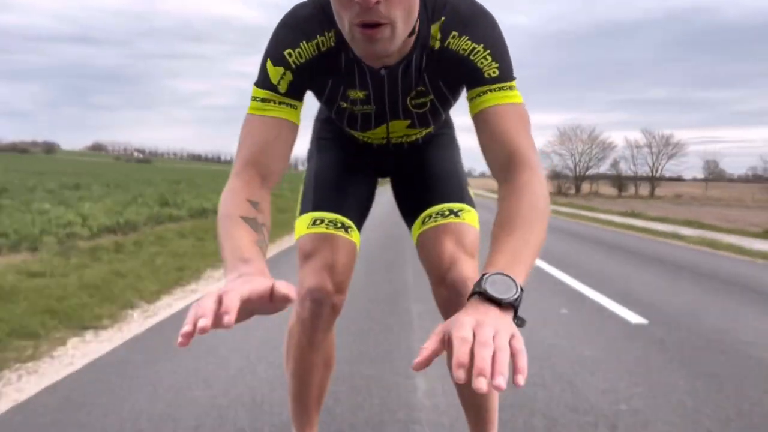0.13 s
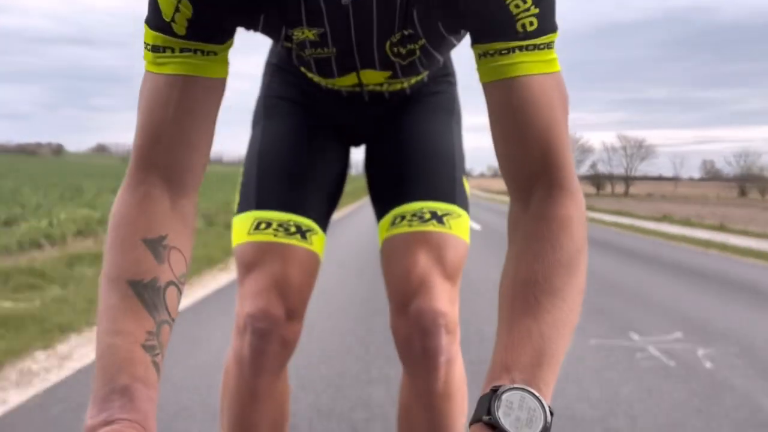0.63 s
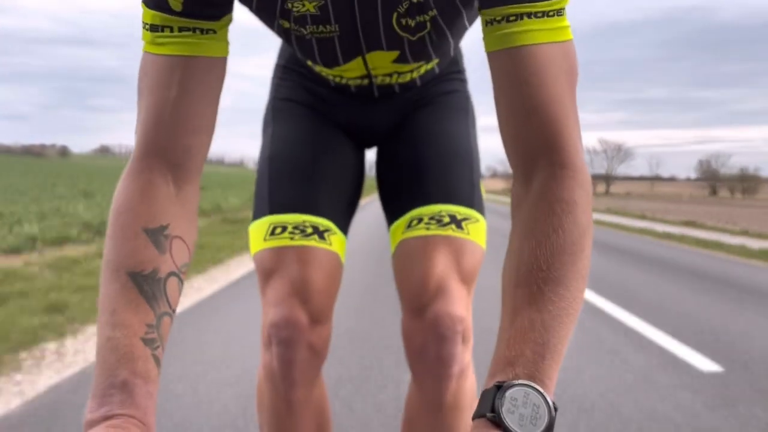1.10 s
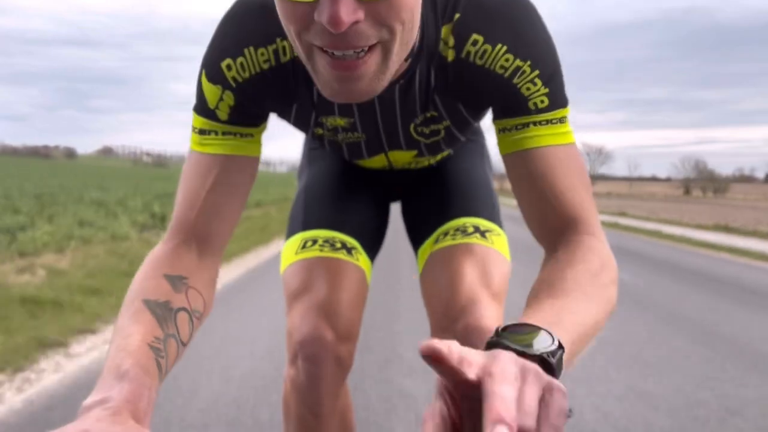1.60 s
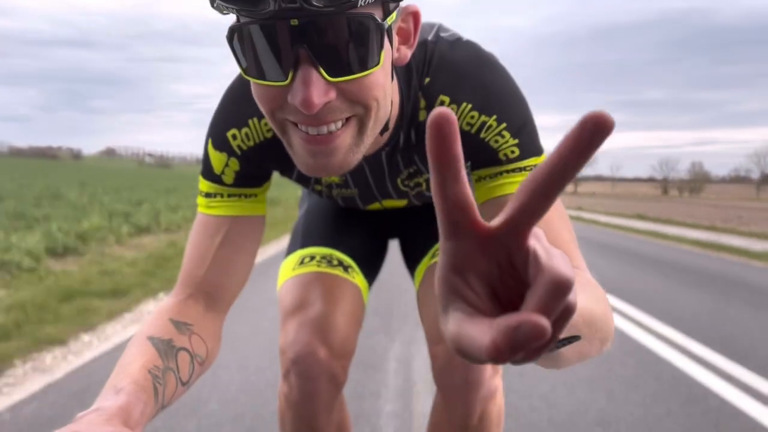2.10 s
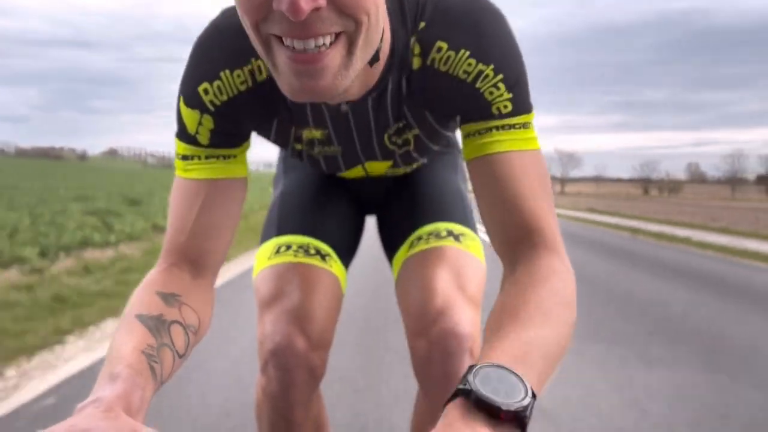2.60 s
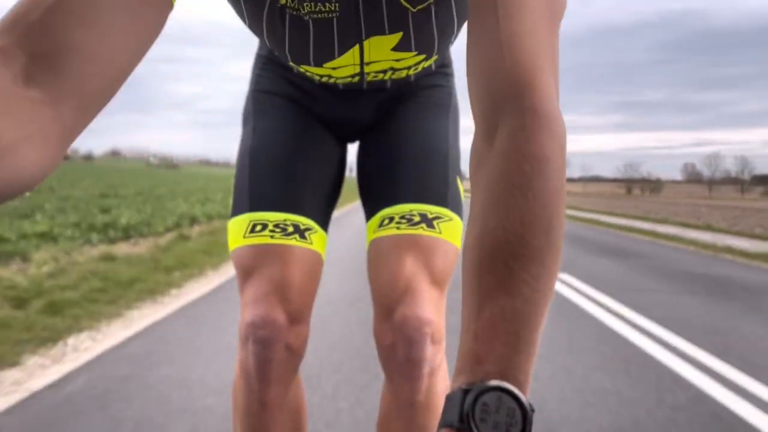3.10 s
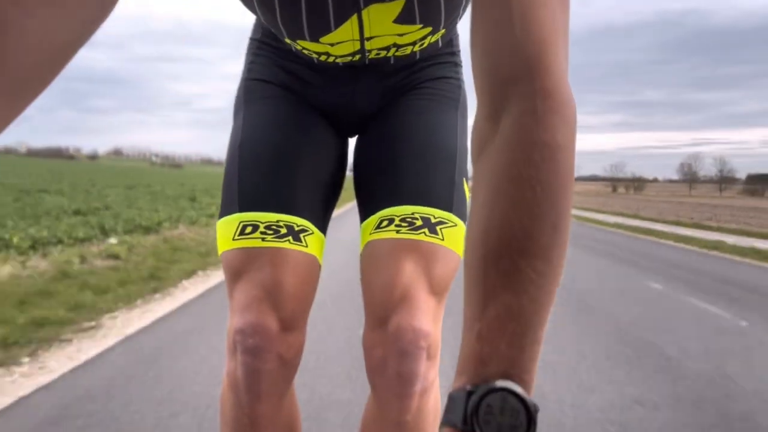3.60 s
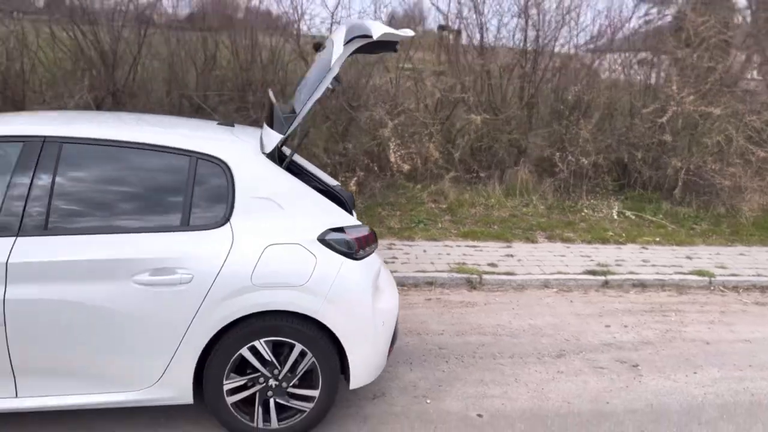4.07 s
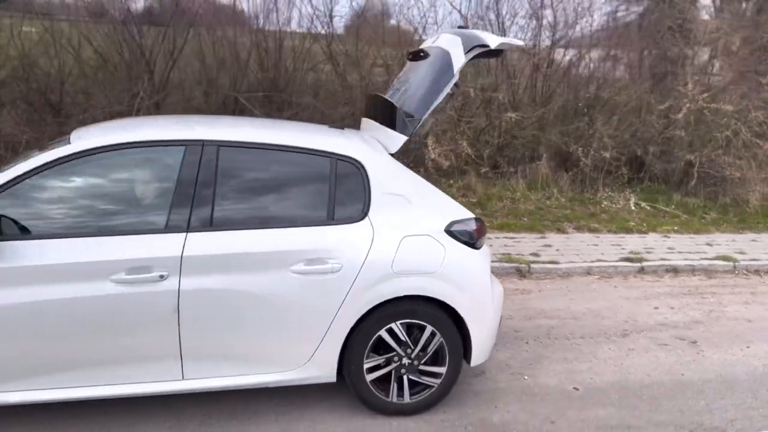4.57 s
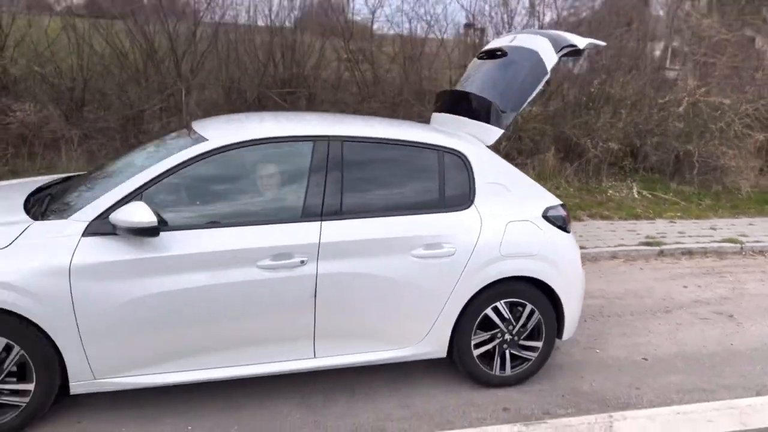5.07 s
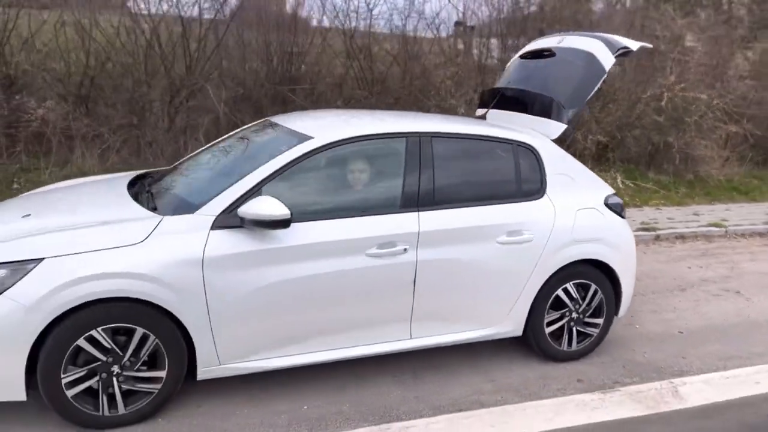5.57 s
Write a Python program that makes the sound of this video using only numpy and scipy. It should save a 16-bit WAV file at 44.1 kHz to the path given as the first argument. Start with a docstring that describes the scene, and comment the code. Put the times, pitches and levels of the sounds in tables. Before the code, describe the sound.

For the first 3.7 seconds, a phone in the open hatch of a moving car catches a loud, broad rush of tyres and small hard wheels on rough asphalt, hollow with boot resonances and wavering wheel tones. Beneath it runs a low engine drone near 57 Hz, sagging slightly, easing off around 0.9. Wind buffets throughout. A sharp stone chip clicks at 0.36; a strong gust and thumps hit near 0.77, after which the hiss dulls; another chip and thump come at 2.6. The ride fades rapidly by 3.8, and a much quieter open roadside fades in. A distant vehicle passes dully around 4.0, while thin high bird notes fall at 3.9 and 4.0, with a very faint one at 4.6. Skate wheels scrape sandily and tick on grit, drifting left, rolling more smoothly with faint hollow tones from 4.8. Soft low wind puffs bump the handheld microphones from 4.2 to the end.

```python
"""A phone rides in the open hatch of a car: three-cylinder drone from harmonics of one phase, tyre and
small-wheel rush from flickering noise bands, buffeting air from low noise, two stone chips and a few thumps.
At 3.8 s the ride has faded out and the roadside fades in: puffs of wind thump on the hand-held microphones,
a far vehicle passes as dull noise, skate wheels scrape in resonant noise and tick as ringing modes to the left,
and a small bird calls in sliding sines."""
import sys
import numpy as np
from scipy import signal
from scipy.fft import rfft, irfft, next_fast_len
from scipy.io import wavfile
from scipy.ndimage import uniform_filter1d, map_coordinates

SR = 44100
rng = np.random.default_rng(int(sys.argv[2]) if len(sys.argv) > 2 else 0)


def file_out(sig):
    """Save sig as 16-bit WAV at sys.argv[1]."""
    # one column per channel
    cols = np.atleast_2d(sig).T
    # limit, then scale
    lim = np.clip(cols, -1, 1)
    pcm = np.round(lim * 32767).astype(np.int16)
    wavfile.write(sys.argv[1], SR, pcm)


def level_to_linear(level):
    """Convert decibel levels to linear amplitude factors, elementwise."""
    exponent = np.asarray(level, float) / 20
    return 10 ** exponent


N = 250929
T = np.arange(N) / SR
SIZE = next_fast_len(N)
HZ = np.arange(SIZE // 2 + 1) * SR / SIZE + 1e-3  # just above zero, for logarithms
SIDES = np.array([[1], [-1]])  # left, right

# All source levels stand ahead of the fades in scene().
# Fade-in of the roadside: (time [s], gain [0-1])
KERB_FADE = [(3.797, 0), (3.86, 0.41), (3.95, 0.75)]
# Resonances of the skate wheels: (frequency [Hz], width [Hz], lift [dB])
WHEEL = [(950, 200, 2), (1480, 220, 8), (1660, 150, 5), (1870, 110, -3), (2100, 170, 1), (3350, 500, 6),
         (5600, 1200, 2), (6600, 700, 1), (8300, 800, -3)]
# Likeness of the two microphone ports in the car: (frequency [Hz], likeness [0-1])
RIDE_LIKE = [(60, .8), (130, .52), (280, .7), (620, .4), (1340, .72), (2900, .5), (5500, .15), (7600, .9),
             (8600, .9), (10000, .6), (12000, .55), (14000, .7)]
# Phase lead of the left port in the car: (frequency [Hz], lead [rad])
RIDE_LEAD = [(0, 0), (700, .6), (1030, .2), (1900, -.7), (5200, -1.1), (6500, 3.1), (8300, 3.3),
             (9600, 4.4), (11000, 6.1), (13000, 6.3), (14000, 9.2)]
# Ports in the car: likeness, balance (frequency [Hz], left minus right [dB]), lead
RIDE_PORTS = RIDE_LIKE, [(60, -5), (110, 0), (200, -7), (370, -3), (670, -3), (1230, -2.5), (2240, -2.5),
              (4110, -6.5), (7510, -2.5), (13700, -0.5)], RIDE_LEAD
# Likeness of the two ports at the roadside: (frequency [Hz], likeness [0-1])
KERB_LIKE = [(60, .75), (130, .65), (280, .8), (620, .5), (1340, .3), (2900, .1), (13700, .1)]
# Phase lead of the left port at the roadside: (frequency [Hz], lead [rad])
KERB_LEAD = [(0, 0), (400, 0), (950, -1), (10000, -15)]
# Ports at the roadside: likeness, balance (frequency [Hz], left minus right [dB]), lead
KERB_PORTS = KERB_LIKE, [(60, 4.5), (110, -3.5), (200, 2), (370, 1), (670, 9.5), (1230, 7), (2240, 6),
              (4110, 14), (7510, 10), (13700, -12)], KERB_LEAD


def curve(rows):
    """Columns of a table as sample-rate curves."""
    s, *columns = np.transpose(rows)
    return [np.interp(T, s, c) for c in columns]


def over_hz(points):
    """A spectrum table at every bin, read along log frequency."""
    hz, value = np.transpose(points)
    return np.interp(np.log(HZ), np.log(np.maximum(hz, 1)), value)


def humps_db(modes):
    """Resonances as bell-shaped lifts in dB."""
    return sum(db / (1 + (2 * (HZ - hz) / width) ** 2) for hz, width, db in modes)


def walk(rate):
    """Random levels held 1 / rate s and slewed twice; spread 1."""
    hold = max(int(SR / rate / 16), 1)  # worked out every 16th sample
    levels = np.repeat(rng.standard_normal(N // 16 // hold + 2), hold)
    levels = uniform_filter1d(uniform_filter1d(levels, hold), hold)
    return np.interp(np.arange(N) / 16, np.arange(len(levels)), levels / levels.std())


def heard(colour_db, ports, source_db):
    """Spectra of a fluttering noise at the two ports: partly alike, one louder, one leading."""
    likeness, balance, lead = ports
    like = np.clip(np.abs(over_hz(likeness)), 0, 1)
    pan = over_hz(balance)
    turn = np.exp(1j * np.interp(HZ, *np.transpose(lead)))
    a, b = rfft(rng.standard_normal((2, SIZE)) * level_to_linear(np.resize(source_db, SIZE)))
    left = a * turn * level_to_linear(pan / 2)
    right = (like * a + np.sqrt(1 - like ** 2) * b) * level_to_linear(-pan / 2)
    pair = level_to_linear(colour_db) * np.array([left, right])
    return pair / np.sqrt(np.sum(np.abs(pair) ** 2)) * SIZE  # mean power 1 over the ports


def turbulence(colour_db, ports, source_db, flicker_db, rate, tilt_db=lambda hz: 0):
    """Overlapping noise bands, half an octave apart, that share the source's flutter and each flicker alone."""
    pair, out = heard(colour_db, ports, source_db), 0
    for hz in 20 * 2 ** np.arange(0, 10, .5):
        window = np.cos(np.pi * np.clip(np.log2(HZ / hz), -.5, .5)) ** 2
        # bands 60 dB under the strongest are left out
        if np.max(colour_db[window > .5]) > np.max(colour_db) - 60:
            band = irfft(pair * window, SIZE)[:, :N]
            out = out + band * level_to_linear(flicker_db * walk(rate) + tilt_db(hz))
    return out


def bursts(rows, rise_s=None, fall_s=None):
    """Summed power of events (s, dB, time constant) that grow and die away exponentially."""
    power = 0
    for s, db, tau in rows:
        rise, fall = rise_s or tau, fall_s or tau
        power = power + level_to_linear(2 * db) * np.exp(2 * np.minimum((T - s) / rise, (s - T) / fall))
    return power


def tones(rows, width, ports, flutter_db, rate):
    """Narrow fluttering noise bands, each read at a changing speed so that its pitch glides."""
    out, n = np.zeros((2, N)), np.arange(N)
    white = heard(0, ports, 0)
    flutter = level_to_linear(flutter_db * walk(rate))
    drift = .01 * walk(6)  # wander as a share of the pitch
    for (start, end, from_hz, to_hz, db), shift in zip(rows, rng.integers(0, N, len(rows))):
        on, hz = n[(T > start) & (T < end)], (from_hz + to_hz) / 2
        along = (T[on] - start) / (end - start)
        band = irfft(white / (1 + (2 * (HZ / hz - 1) / width) ** 2), SIZE)[:, :N]
        speed_change = (along - .5) * (to_hz - from_hz) / hz + drift[on - shift]
        read = on + np.cumsum(speed_change)
        swell = level_to_linear(db) * flutter[on - shift] * np.sin(np.pi * along) ** 0.37
        glide = np.array([np.interp(read, n, port) for port in band])
        out[:, on] += swell * glide / band[:, on].std()
    return out


def add(out, s, sound, pan_db):
    """Mixes a short sound in at time s; positive pan is left."""
    i = int(s * SR)
    sound = sound[:N - i]
    out[:, i:i + len(sound)] += level_to_linear(pan_db / 2 * SIDES) * sound


def buffeting(calm_db, gusts, fall_s, colour, ports, gust_db, flicker_db):
    """Low turbulence on the ports, lumpy at eddy rate, swelling in gusts over a calm level."""
    roll_db = -30 * np.maximum(np.log2(HZ / colour[-1][0]), 0)
    blow = np.sqrt(level_to_linear(2 * calm_db) + bursts(gusts, fall_s=fall_s))
    return blow * turbulence(over_hz(colour) + roll_db, ports, gust_db * walk(30), flicker_db, 15)


def engine():
    """Three-cylinder drone: the firing order leads, weaker cycle orders beat against it."""
    # Orders of the engine: (multiple of the three-cylinder cycle, level [dB])
    harmonics = [(2, -42), (3, 1.5), (4, -10.5), (6, -18.5), (8, -18.5), (10, -24.5)]
    # the revs sag slowly throughout, with one quicker drop near 0.87 s as the driver eases off
    ease_s, ease_length_s = 0.871, 0.41
    eased = np.clip((T - ease_s) / ease_length_s + .5, 0, 1)
    firing_hz = 57.8 - 1.6 * eased - .62 * T
    lift_s = ease_s - ease_length_s / 2
    dip = np.exp(np.minimum((T - lift_s) / 0.085, (lift_s - T) / 0.67))
    level_db = -21 - 3 * dip
    phase = 2 * np.pi * np.cumsum(firing_hz / 3) / SR
    lead = 0.15 * SIDES * walk(5.56)  # the wake bends the path to each port
    tone = 0
    for k, db in harmonics:
        gain = level_to_linear(db + 0.4 * k * walk(18))
        tone = tone + gain * np.sin(k * phase + 0.16 * k * walk(11) + lead)
    return np.sqrt(2) * tone * level_to_linear(level_db - 1.1 * SIDES)


def road():
    """Tyres and small hard wheels on rough asphalt, ringing in the open boot."""
    # Spectrum of the rush: (frequency [Hz], density [dB per Hz])
    rush_colour = [(200, 4.5), (330, 0), (560, -3), (1000, -3.5), (1400, -6), (2400, -4), (2900, -7),
                   (3500, -17), (4100, -17.5), (4800, -19.5), (6200, -22), (9000, -23.5), (11000, -30),
                   (13500, -33)]
    # Resonances of the open hatch: (frequency [Hz], width [Hz], lift [dB])
    hatch = [(344.4, 26, 5), (491.6, 72, 8), (639, 21.5, 7.5), (933, 147, 6.5), (1175, 18, 5),
             (1357, 39, 7.5), (1620, 110, 6.5), (1855, 99, -5), (1970, 55, 5.5), (2357, 37, 7),
             (3613, 560, 8.5)]
    # Coarseness of the asphalt: (time [s], hiss lift [dB])
    asphalt = [(0, 1), (.42, 1.5), (.65, 1.5), (.78, 0.5), (2.87, 2), (3.24, 0), (3.38, 3), (3.68, 0.5)]
    # Wheel tones that swell, glide and fade with the road surface:
    # (start [s], end [s], from [Hz], to [Hz], level [dB])
    song = [(-0.4, .85, 2490, 2380, -37.5), (0.8, .7, 2210, 2000, -38.5), (-1, .42, 1620, 1560, -37.5),
            (0.46, 0.77, 1600, 1640, -35.5), (1, .5, 760, 1020, -35), (-0.4, 0.304, 800, 830, -36.5),
            (-0.2, 0.8, 680, 670, -38), (0, 1.084, 465, 450, -38), (0.8, 2.05, 3620, 3550, -48.5),
            (1.5, 1.3, 1000, 740, -38), (1.8, 2.85, 342, 330, -35.5), (1.5, 2.8, 1630, 1600, -41),
            (2.5, 3.1, 2440, 2560, -40.5), (2.5, 3.47, 3560, 3420, -42.5), (3.15, 3.9, 1010, 960, -35),
            (3.5, 3.9, 890, 880, -40.5), (2.5, 3.95, 2000, 1950, -39), (2.5, 3.5, 5000, 4900, -49.5)]
    # the wheels sizzle brighter, with fuller mids, until the skater has hold of the car
    free = np.clip((0.75 - T) / .15 + .5, 0, 1)
    mids_db = curve(asphalt)[0] + 1.5 * free
    treble_db = 3 - 0.74 * T + 2.5 * free

    def tilt(hz):
        return mids_db * (550 < hz < 4300) + treble_db * (hz > 4300)

    edges_db = -24 * np.maximum(np.log2(260 / HZ), 0) - 400 * np.maximum(np.log2(HZ / 14200), 0)
    colour_db = over_hz(rush_colour) + humps_db(hatch) + edges_db
    # bumps in the asphalt shake the whole spectrum at once
    bumps_db = 0.57 * walk(60) + 0.49 * walk(300)
    rush = level_to_linear(-28.5) * turbulence(colour_db, RIDE_PORTS, bumps_db, 0.87, 3.95, tilt)
    # phone and hatch sway, so the resonances wander by about 0.9 % of their pitch
    read = np.arange(N) + np.cumsum(.009 * walk(2.5))
    rush = np.array([map_coordinates(port, [read], mode="mirror") for port in rush])
    # an echo off the swaying skater draws a comb that drifts
    lag = SR * (.0027 + 0.00015 * walk(1.45))
    echo = np.array([np.interp(np.arange(N) - lag, np.arange(N), port) for port in rush])
    return rush + 0.21 * echo + tones(song, .055, RIDE_PORTS, 2.2, 22)


def wake():
    """Air buffeting behind the car: a steady level of low turbulence, and gusts."""
    # Spectrum of the wake: (frequency [Hz], density [dB per Hz])
    wake_colour = [(20, -33), (33, -8.5), (45, -16), (65, 1.5), (85, -3), (120, -5), (170, -13.5),
                   (260, -18.5), (450, -44), (800, -31.5)]
    # Gusts: (peak time [s], peak level [dB], rise [s])
    gusts = [(.06, -35, 0.041), (.34, -25, 0.043), (.58, -24, 0.44), (.755, -17, 0.12), (.95, -22, 0.071),
             (1.32, -27, 0.051), (1.66, -25, 0.062), (2.44, -26.5, 0.22), (3.5, -28.5, 0.95)]
    return buffeting(-25, gusts, 0.088, wake_colour, RIDE_PORTS, 1.0, 1.42)


def stones():
    """Stone chips against the car: very short bright noise cracks on the bodywork."""
    # Chips: (time [s], peak level [dB], decay [s])
    chips = [(0.3582, -17, .0005), (.3604, -28, 0.0018), (2.577, -29, .006)]
    out, t = np.zeros((2, N)), np.arange(600) / SR
    for (s, db, decay_s), noise in zip(chips, rng.standard_normal((len(chips), 602))):
        crack = np.convolve(np.diff(noise, 2), [1, 2, 1], "same") * np.exp(-t / decay_s)
        add(out, s, level_to_linear(db) * crack / np.abs(crack).max(), -.5)
    return out


def thumps():
    """Eddies bursting on the microphones: a short low swing, with a snap that drops from a pop to a thud."""
    # Single eddies: (centre time [s], swing level [dB], swing frequency [Hz], snap level [dB])
    eddies = [(0.764, -12.5, 83.4, -17), (0.771, -23, 139.8, -14), (0.796, -16, 61, -45),
              (2.58, -34, 200, -17.5), (2.602, -14, 100.5, -16), (4.202, -37, 111.3, -31),
              (4.213, -17, 116, -52), (4.452, -30, 139, -54), (4.476, -28, 69.5, -57),
              (4.74, -16.5, 114, -35), (4.761, -17.5, 79.5, -49), (4.87, -19.5, 78, -58),
              (4.961, -19, 77, -50), (5.022, -23, 68.4, -48), (5.063, -26, 168.4, -25),
              (5.183, -23, 102, -55), (5.258, -33, 139.2, -26), (5.272, -28, 94, -50),
              (5.361, -29.5, 57, -55), (5.451, -26, 75, -55)]
    out, t = np.zeros((2, N)), np.arange(-2400, 2400) / SR
    # snap pitch as a multiple of the swing, from 3.3 down to 0.6
    snap_rise_s, snap_drop_s, snap_fall_s = .0025, .005, .011
    drop = .6 + (3.3 - .6) * np.exp(-np.maximum(t + snap_rise_s, 0) / snap_drop_s)
    shape = np.exp(-(np.minimum(t, 0) / snap_rise_s) ** 2 - np.maximum(t, 0) / snap_fall_s)
    turns = rng.uniform(-np.pi, np.pi, (len(eddies), 3))
    for (s, db, hz, snap_db), turn in zip(eddies, turns):
        cycles = hz * t
        glide = 0.22 * turn[2] * cycles ** 2
        swing = np.exp(-(cycles / 0.88) ** 2) * np.sin(2 * np.pi * cycles + glide + turn[0])
        snap = shape * np.sin(2 * np.pi * hz * np.cumsum(drop) / SR + turn[1])
        pan_db = -7 if s < KERB_FADE[0][0] else 2
        add(out, s + t[0], level_to_linear(db) * swing + level_to_linear(snap_db) * snap, pan_db)
    return out


def breeze():
    """Roadside wind: low turbulence in puffs that build up and collapse."""
    # Spectrum of the breeze: (frequency [Hz], density [dB per Hz])
    breeze_colour = [(20, -30), (45, -2.5), (85, 2.5), (150, -5), (250, -8.5), (400, -26.5), (550, -49),
                     (900, -66)]
    # Puffs: (peak time [s], peak level [dB], rise [s])
    puffs = [(3.95, -45, 0.16), (4.164, -38.5, 0.38), (4.214, -27.5, 0.035), (4.365, -39, 0.22),
             (4.42, -38, .03), (4.478, -34, 0.097), (4.55, -31, 0.036), (4.63, -37, .04), (4.7, -33, .05),
             (4.766, -27.5, 0.063), (4.815, -32, .04), (5.06, -30, 0.33), (5.276, -30, 0.26),
             (5.38, -39, 0.046), (5.455, -33.5, 0.015), (5.52, -41.5, .1)]
    return buffeting(-49.5, puffs, 0.011, breeze_colour, KERB_PORTS, 2.6, 1.8)


def traffic():
    """Far tyre roar, smooth and dull; a vehicle swells and draws away, fuller in the low mids while near."""
    # Spectrum of the roar: (frequency [Hz], density [dB per Hz])
    traffic_colour = [(60, -13), (150, -2), (300, 0), (550, -10), (900, -11.5), (1500, -16), (3000, -30.5),
                      (5000, -40), (7000, -48)]
    # Resonances of the roar: (frequency [Hz], width [Hz], lift [dB])
    pass_tones = [(369, 52, 8), (493, 31, 5), (627, 36, 6.5), (870, 60, 3)]
    pass_s, rise_s, fall_s = 4.03, 0.3, 0.52
    near = np.exp(np.minimum((T - pass_s) / rise_s, (pass_s - T) / fall_s))
    gain = np.hypot(level_to_linear(-52.5), level_to_linear(-49.5) * near)  # steady roar and passing vehicle

    def body_db(hz):
        return 7 * near * (300 < hz < 700)

    colour_db = over_hz(traffic_colour) + humps_db(pass_tones)
    return gain * turbulence(colour_db, KERB_PORTS, .5, 1.0, 2.18, body_db)


def scrape():
    """Slow wheels on grit: a hollow roll in the wheel resonances and, in fits, a sandy top."""
    # Wheels rolling on grit: (time [s], level [dB])
    rolling_level = [(4.05, -67), (4.3, -54.5), (4.6, -58), (4.78, -56.5), (4.88, -52), (5.25, -53),
                     (5.47, -62), (5.69, -62)]
    # Spectrum of the roll: (frequency [Hz], density [dB per Hz])
    roll_colour = [(500, -21), (900, -8), (1250, -12.5), (1900, -7), (2600, -13), (3200, -44)]
    # Spectrum of the sand: (frequency [Hz], density [dB per Hz])
    sand_colour = [(1800, -24), (2700, -3), (4000, -10.5), (6200, -7), (7500, -11), (9500, -10.5),
                   (10500, -42), (11500, -70)]
    # Sand sprayed by a push of the skate: (time [s], peak level [dB], decay [s])
    sprays = [(4.054, -55.5, 0.03), (4.108, -60, 0.09), (4.224, -60, 0.038), (4.282, -55, 0.11),
              (4.36, -68, 0.0623), (4.45, -61, 0.053), (4.51, -58, 0.011), (4.582, -57, 0.019),
              (4.625, -62, 0.023), (4.715, -59, 0.03), (4.746, -53.5, 0.025), (5.33, -60, 0.11),
              (5.43, -59, 0.036), (5.6, -72, .1)]
    # Tones of the wheels while they roll freely: (start [s], end [s], from [Hz], to [Hz], level [dB])
    hum = [(4.81, 5.44, 1716, 1621, -54), (4.86, 5.3, 2160, 2094, -57), (5.02, 5.56, 1524, 1444, -62.5)]
    wheel_db = humps_db(WHEEL)
    roll = turbulence(over_hz(roll_colour) + wheel_db, KERB_PORTS, 2.0 * walk(90), 2.0, 22.1)
    grains_db = 1.5 * rng.exponential(size=N // 64 + 1).repeat(64)[:N]
    grit_db = 0.74 * walk(150) + grains_db
    sand = turbulence(over_hz(sand_colour) + wheel_db, KERB_PORTS, grit_db, 1.9, 20)
    rolling = level_to_linear(curve(rolling_level)[0])
    # sand hisses along under the roll, a tenth as strong until just after 4.7 s
    loose = level_to_linear(-6.5) * rolling * np.clip((T - 4.7) / 0.26, .1, 1)
    sand_gain = np.sqrt(loose ** 2 + bursts(sprays, rise_s=0.0034))
    return rolling * roll + tones(hum, .05, KERB_PORTS, 2.5, 70) + sand_gain * sand


def ticks():
    """Grit ticking under wheels: each grain rings the low wheel modes and cracks through the high ones."""
    # Grains: (time [s], ring [dB] before a lift of 1.2 dB, crack [dB] before a lift of 6.5 dB)
    grains = [(3.8551, -43, -72), (4.0484, -50, -61), (4.0565, -38.5, -62), (4.1106, -43, -54),
              (4.124, -44, -58), (4.146, -47, -70), (4.1794, -46, -68), (4.2243, -47, -62),
              (4.2797, -39.5, -62), (4.3155, -40, -54), (4.361, -54, -58), (4.4535, -44.5, -68),
              (4.5033, -46, -68), (4.5606, -53, -70), (4.5798, -46, -48), (4.6205, -47, -53),
              (4.6945, -50, -57), (4.7237, -48, -66), (4.7435, -40.5, -48.5), (4.7495, -48, -56),
              (4.794, -56, -60), (4.8179, -47, -60), (4.828, -47, -68), (4.846, -44, -63.5),
              (4.956, -57, -56), (5.0504, -52, -54), (5.1374, -41, -56), (5.1771, -42, -64),
              (5.217, -41, -69), (5.3005, -50, -58), (5.3372, -51, -68), (5.3712, -45, -65),
              (5.43, -45, -66), (5.4575, -44.5, -66), (5.518, -54, -72), (5.5478, -47, -62),
              (5.5942, -49, -64), (5.658, -51, -62)]
    out, t = np.zeros((2, N)), np.arange(900) / SR
    # 14 faint grains scattered at random
    when, size = rng.uniform(size=(14, 2)).T
    faint = np.transpose([4.06 + 1.6 * when, -59 + 6 * size, -69 + 6 * size])
    rows = [*grains, *faint]
    contact = 1 - np.exp(-t / .0007)
    damping = np.exp(-t / .007)  # by the ground
    for (s, ring_db, crack_db), noise in zip(rows, rng.standard_normal((len(rows), 900))):
        pan_db = 3.5 + 6.5 * (s - 4) + 2.9 * noise[-1]  # the wheels drift further left
        modes = []
        for (hz, width, _), strength, detune in zip(WHEEL, noise, noise[::-1]):
            sine = np.sin(2 * np.pi * hz * (1 + .025 * detune) * t)
            modes.append(level_to_linear(3 * strength) * np.exp(-1.2 * width * t) * sine)
        low = .5 * modes[0] + modes[1] + .6 * modes[2] + .3 * modes[4]
        high = 2.2 * modes[5] + modes[6] + modes[7] + .5 * modes[8]
        ring = low * contact * damping
        crack = np.convolve(noise * np.exp(-t / .0007), high[:200])[:900]
        ring = level_to_linear(ring_db + 1.2) * ring / np.abs(ring).max()
        crack = level_to_linear(crack_db + 6.5) * crack / np.abs(crack).max()
        add(out, s, ring + crack, pan_db)
    return out


def bird():
    """Thin, nearly pure whistles with soft ends; each flicks up to its top, then slides down and swells."""
    # Notes: (start [s], length [s], top [Hz], fall [Hz], level [dB])
    notes = [(3.885, 0.0666, 7220, 200, -65), (4.005, 0.064, 7450, 1610, -63.5),
             (4.596, 0.048, 7250, 250, -77)]
    out = 0
    for start, length, hz, fall_hz, db in notes:
        along = np.clip((T - start) / length, 0, 1)
        flick_hz = 800 * np.exp(-along * length / .004)
        pitch = hz - fall_hz * along ** 1.4 - flick_hz
        ends = np.clip(np.minimum(T - start, start + length - T) / 0.0053, 0, 1)
        level = level_to_linear(db - 7.5 * (0.5 - along) + 2.3 * walk(150))
        out = out + np.sqrt(2) * ends * level * np.sin(2 * np.pi * np.cumsum(pitch) / SR)
    return out * level_to_linear(3.4 * SIDES)


def scene():
    """The ride, faded out, then the roadside, faded in."""
    # Fade-out of the ride: (time [s], gain [0-1])
    ride_fade = [(3.675, 0.88), (3.74, 0.27), (3.797, 0)]
    eddies = thumps()
    ride = engine() + road() + wake() + stones() + eddies
    kerb = breeze() + traffic() + scrape() + ticks() + bird() + eddies
    return ride * curve(ride_fade)[0] + kerb * curve(KERB_FADE)[0]


def top_cut(x):
    """Nothing passes above the cut-off."""
    return signal.sosfilt(signal.butter(12, 14330, fs=SR, output="sos"), x)


def record(dry):
    """The finished mix as the phone keeps it."""
    return top_cut(dry)


dry = scene()
out = record(dry)
file_out(out)
```